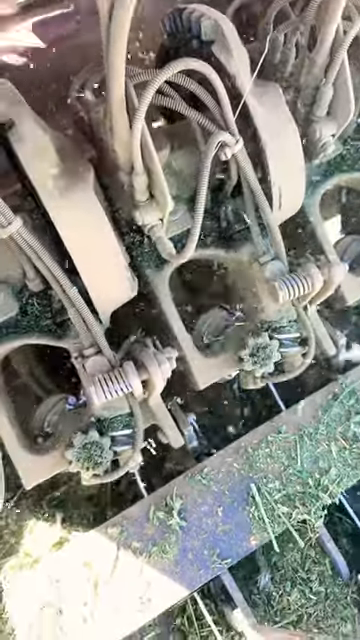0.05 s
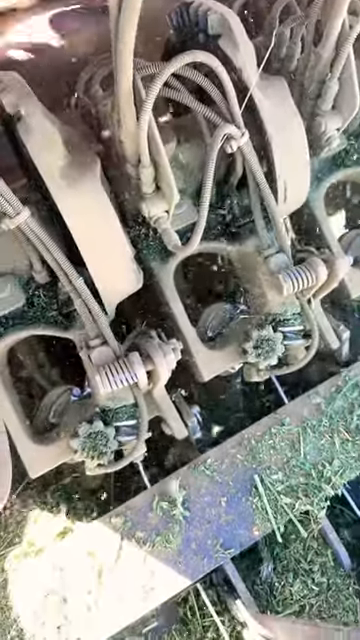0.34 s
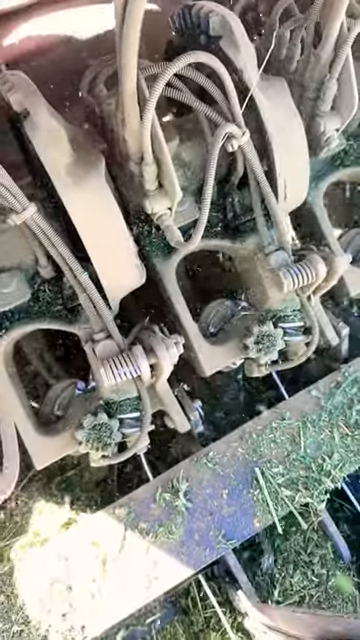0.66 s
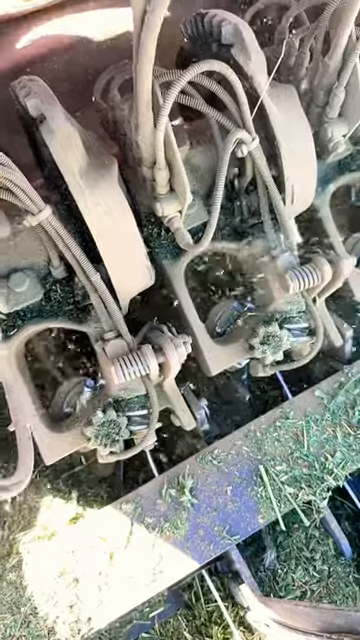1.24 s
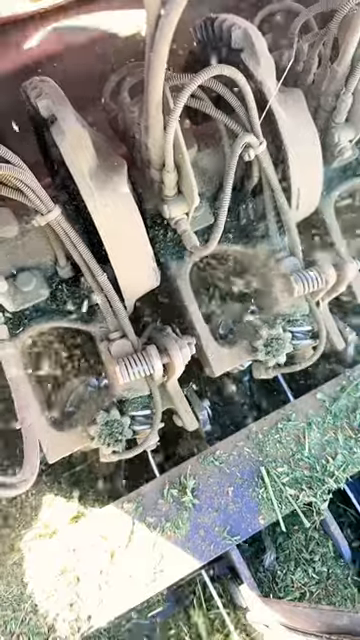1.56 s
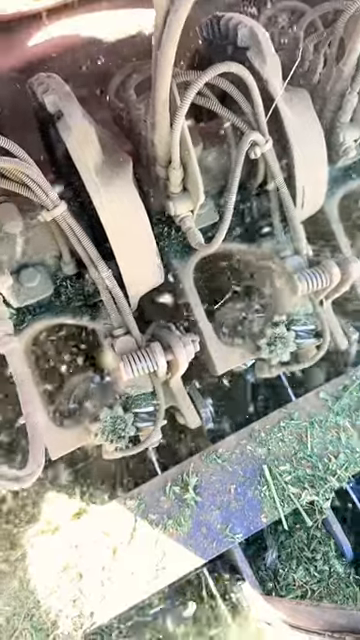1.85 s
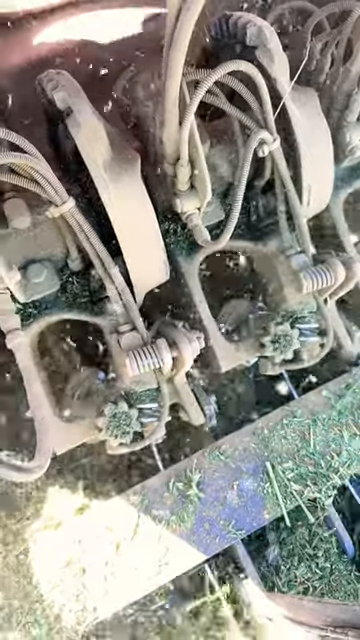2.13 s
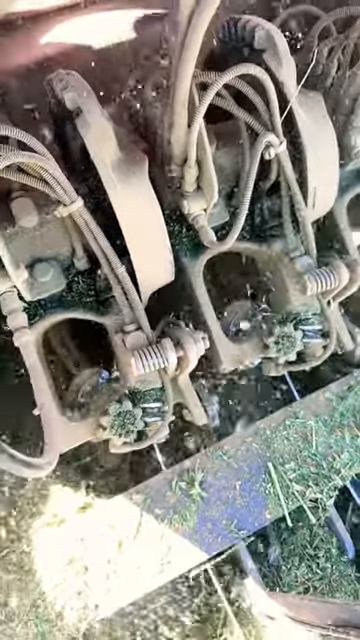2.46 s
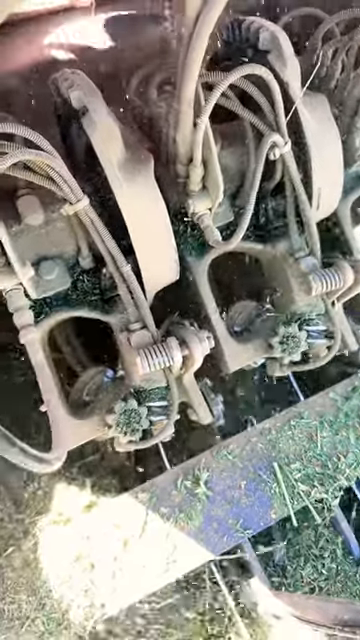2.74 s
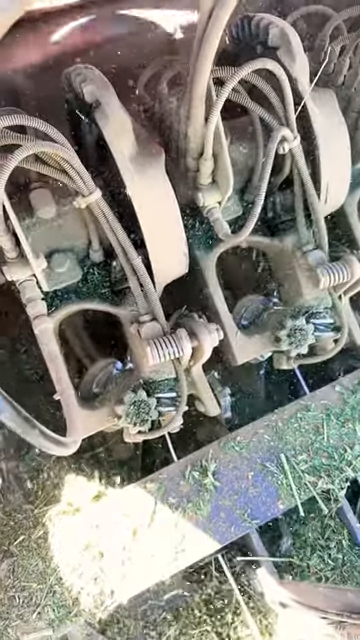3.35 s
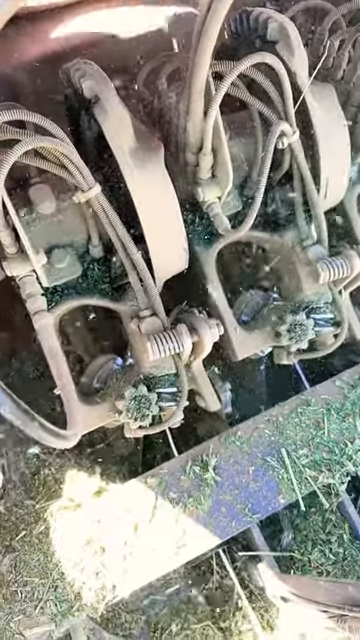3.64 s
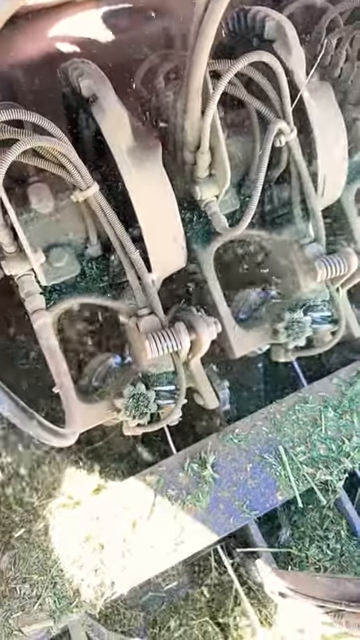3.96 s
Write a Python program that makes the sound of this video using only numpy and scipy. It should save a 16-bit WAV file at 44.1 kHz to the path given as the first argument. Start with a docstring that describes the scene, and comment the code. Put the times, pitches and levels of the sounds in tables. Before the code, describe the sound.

A hay baler drones in slow motion throughout, heard up close, with low sliding tones, wavering gear whines and a soft rush of hay. From about 1.2 to 2.3 seconds its knotter cycles in louder, drawn-out clacks. Two heavy blows ring the metal near 1.5 and 2.1 seconds, with thin steel squeaks around them. The drone and a quieter smeared rattle then carry on until 4 seconds.

```python
"""A heavy, wandering drone under a cloud of gliding partials: a hay baler at work, in slow motion.
The stereo microphone sits just above the knotters, its two ports hearing each tone at a different phase.
Tractor and baler drone, the running gear whines, and hay and chaff rush softly behind them.
The knotter cycles once, from about 1.2 to 2.3 s: each clack is drawn out into a swell,
two heavy blows ring the frame, and the steel parts sing on."""
import sys
import numpy as np
from scipy import signal
from scipy.fft import rfft, irfft
from scipy.io import wavfile

SR = 44100
rng = np.random.default_rng(int(sys.argv[2]) if len(sys.argv) > 2 else 0)


def to_wav(s):
    """Save 16-bit WAV."""
    ch = np.atleast_2d(s).T  # columns
    pcm = np.round(np.clip(ch, -1, 1) * 32767)  # PCM
    wavfile.write(sys.argv[1], SR, pcm.astype(np.int16))


N = 176400
STEP = 128  # samples between control points
T = np.arange(N // STEP + 2) * STEP / SR

# rush of hay and chaff, relative to the machine's level (frequency [Hz], level [dB])
CHAFF_SPECTRUM = [(25, -17), (60, -19), (150, -12), (300, -15), (800, -14), (2000, -11), (5000, -7),
                  (10500, -5), (11600, -12), (12300, -36), (13600, -26), (15000, 4.5), (15800, -3)]
# held tones of tractor and baler (middle [s], length [s], pitch [Hz], slide [Hz], relative level [dB])
DRONE_TONES = [(0.057, 0.081, 140.4, -41, -37), (0.068, 0.065, 71, 24, -31.5),
               (0.075, 0.13, 219.8, -3, -29), (0.076, 0.23, 615, -40, -38), (0.104, 0.15, 353, 25, -36.5),
               (0.255, 0.13, 284, -24, -35), (0.27, 0.31, 107, -3.5, -36),
               (0.343, 0.34, 177.2, -6.5, -37.5), (0.404, 0.18, 367.6, -10, -38.5),
               (0.475, 0.21, 69, 17, -40), (0.627, 0.13, 435.5, -0.5, -38), (0.748, 0.417, 107, -46.5, -36),
               (0.761, 0.19, 148.7, 63, -32.5), (0.96, 0.252, 242.6, -58.5, -38),
               (1.124, 0.46, 348, 5, -39.5), (1.152, 0.21, 117.6, -18.5, -37.5),
               (1.267, 0.45, 257.7, -30.5, -36.5), (1.4, 0.2, 344, 24, -34.5), (1.389, 0.31, 128, -70, -34),
               (1.451, 0.058, 133, 9.5, -21), (1.464, 0.42, 603.4, 3, -35), (1.47, 0.08, 677, 0.5, -30.5),
               (1.466, 0.3, 758, -40, -41), (1.491, 0.058, 190.6, -2, -21.5), (1.51, 0.11, 800, 2, -33.5),
               (1.53, 0.19, 404, 18.5, -33.5), (1.589, 0.47, 504, -60.5, -38.5),
               (1.611, 0.17, 271, 44.5, -28.5), (1.696, 0.28, 128, -10, -24.5),
               (1.714, 0.097, 236.7, 17, -36), (1.86, 0.12, 224.5, 19.5, -29.5),
               (1.96, 0.2, 510, -58.5, -35.5), (1.999, 0.22, 156, -47.5, -24.5),
               (2.01, 0.29, 582.5, -26, -35), (2.015, 0.19, 299, 31, -28.5), (2.042, 0.46, 787, 44, -39),
               (2.094, 0.103, 444, 43, -31), (2.098, 0.25, 236, 15, -32), (2.152, 0.15, 151, 3.5, -29.5),
               (2.184, 0.3, 699, -21.5, -36.5), (2.194, 0.23, 390, 3, -35.5), (2.352, 0.075, 135, 10, -35),
               (2.356, 0.17, 66.3, -24.5, -34), (2.371, 0.1, 238, -4.5, -34),
               (2.483, 0.19, 163.8, -47.5, -33.5), (2.571, 0.1, 649, 14, -31), (2.612, 0.23, 113, 35, -34),
               (2.62, 0.3, 590, -7.5, -35), (2.74, 0.27, 189.8, -45, -34), (2.77, 0.17, 834, -12, -34.5),
               (2.82, 0.21, 298.5, 43.5, -38), (3.007, 0.32, 359, -40.5, -38.5),
               (3.073, 0.31, 181, 5.5, -31.5), (3.218, 0.456, 106.9, 64.5, -37),
               (3.249, 0.28, 345.6, -30, -38.5), (3.328, 0.15, 112.6, -59.5, -34),
               (3.45, 0.38, 226, 12, -35), (3.556, 0.28, 347, 14, -39), (3.596, 0.3, 169.2, 1, -36),
               (3.867, 0.31, 113, -0.5, -38), (3.884, 0.26, 217.7, 42.5, -35.5),
               (3.913, 0.14, 348, -29.5, -36.5), (3.97, 0.23, 597, -60, -36)]
# whines of the running gear (pitch [Hz], level over the machine's [dB], wander scale [Hz])
GEAR_WHINES = [(70.3, -12, 19), (345, -6, 11), (468, -2.5, 17), (593, -5, 12.2), (701, -2, 12),
               (842.7, 0.5, 11)]
# bands of the running din: mids, upper mids, treble (frequency [Hz])
DIN_BANDS = [860, 2170, 4750]
# din leading into the knotter's cycle (time [s], mids [dB], upper mids [dB], treble [dB])
DIN_LEAD_IN = [(0, -26, -35, -42.5), (.218, -31.5, -41.5, -48), (.34, -31, -40.5, -46),
               (.576, -32.5, -46, -48), (.72, -39, -47.5, -47.5), (.95, -36.5, -42, -45.5),
               (1.15, -33.5, -43.5, -47), (1.33, -32, -36.5, -40)]
# din after the cycle (time [s], mids [dB], upper mids [dB], treble [dB])
DIN_TAIL = [(2.43, -33, -40, -43.5), (2.53, -30, -35, -43.5), (2.7, -28.5, -34.5, -43.5),
            (2.86, -33.5, -41.5, -44), (3.02, -30.5, -41.5, -47), (3.24, -35, -48, -46.5),
            (3.33, -35.5, -42, -42), (3.48, -36, -45.5, -44), (3.62, -32, -42, -43.5),
            (3.73, -34, -44.5, -47.5), (4, -30.5, -38, -39.5)]
# share of one partial in the level of its din band (frequency [Hz], level [dB])
DIN_SPECTRUM = [(280, 4.5), (450, -3.5), (650, -2), (850, -8.5), (1100, -7), (1400, -10), (2000, -7.5),
                (3000, -7.5), (3800, -11), (4900, -18.5), (6500, -14), (8000, -15.5), (10000, -20.5),
                (11200, -15), (15500, -17.5)]
# bands of the knotter's clacks (frequency [Hz])
CLACK_BANDS = [800, 2200, 4500, 8000]
# clacks of the knotter (peak time [s], rise [s], fall [s], level in each of the four bands [dB])
KNOTTER_CLACKS = [(1.211, .039, 0.047, -40, -60, -49.5, -61), (1.455, 0.044, 0.051, -35, -35, -38.5, -50.5),
                  (1.58, 0.051, 0.055, -36.5, -41.5, -42, -50), (1.66, 0.024, 0.05, -32.5, -40, -45, -53.5),
                  (1.78, 0.038, 0.04, -37, -43, -44, -47), (1.95, 0.1, 0.061, -37, -44, -49.5, -57),
                  (2.075, 0.066, 0.05, -32, -37, -37, -41), (2.16, 0.033, 0.062, -34, -40.5, -38.5, -40.5),
                  (2.249, 0.029, 0.052, -36, -41, -41, -42.5)]
# colour shared by all clacks (frequency [Hz], level [dB])
CLACK_SPECTRUM = [(300, -2), (1100, 0.5), (1400, -2.5), (2000, 2), (3050, 2.5), (3500, -1), (4300, 1),
                  (4850, -6.5), (5600, 0), (7600, 2.5), (8700, 2), (9500, -2), (11200, -5), (15500, -11)]
# two heavy blows on the frame (peak time [s], rise [s], fall [s], level [dB])
FRAME_BLOWS = [(1.461, 0.046, 0.096, -38), (2.085, 0.048, 0.069, -31)]
# modes of the knotter's steel frame (pitch [Hz], level relative to the blow [dB])
STEEL_MODES = [(1150, 5.5), (1365, 1.5), (1540, -4.5), (1670, -6.5), (1922, -5), (2050, 0), (2210, -17),
               (2710, -24), (3040, -0.5)]
# ringing steel parts (peak time [s], rise [s], fall [s], pitch [Hz], relative level [dB], jitter [Hz])
STEEL_RINGS = [(.35, .05, .05, 1120, -35, 6), (1.56, .035, .05, 1980, -33, 8),
               (1.80, .04, .09, 6799, -37, 25), (1.79, .04, .06, 9819, -38, 20),
               (1.865, .025, .055, 13900, -37, 170), (1.86, .035, .09, 15570, -38, 150),
               (2.07, .04, .06, 6525, -35, 14), (1.63, .08, .08, 2490, -39, 6),
               (2.14, .05, .04, 4530, -34, 30), (2.22, .11, .055, 5233, -34, 20),
               (2.23, .05, .04, 5755, -32, 35), (2.23, .05, .04, 4160, -36, 20),
               (2.21, .09, .04, 7601, -34, 10), (2.2, .08, .045, 7784, -34, 12),
               (2.17, .08, .05, 8037, -35, 12), (2.09, .04, .04, 5250, -35, 20),
               (3.9, .1, .14, 3045, -45, 45)]
# lead of the left microphone port over the right, before the bass taper (frequency [Hz], phase [rad])
MIC_PHASE = [(300, 0.065), (600, 0.53), (1000, 0.49), (1900, 0.36), (2750, 1.09), (3600, 5.3), (4300, 7.1),
             (5200, 4.8), (7000, 7.56), (8300, 4.54), (9500, 5.37), (11200, 3.41), (15500, 2.2)]
# random scatter of that lead (frequency [Hz], phase [rad])
MIC_SCATTER = [(300, 0.1), (600, 0.56), (1700, 0.071), (2500, 1), (4000, 1), (7000, 0.85), (12000, 0.087)]

FLICKER_PER_S, SPACING_HZ = 8.37, 116  # pace of level flicker; gap between the clatter's partials
TONE_WANDER_HZ, TONE_FLUTTER_DB = 5.18, 2.5  # unsteadiness of drone and frame


def amp(db):
    """Decibels to gain."""
    return 10 ** (np.asarray(db) / 20)


def read(points, hz):
    """Reads (Hz, value) points on a log-frequency axis."""
    f, value = np.transpose(points)
    return np.interp(np.log(hz + 1), np.log(f + 1), value)


def drift(per_s):
    """Smooth random motion of unit size."""
    size = 4096
    f = np.fft.rfftfreq(size, STEP / SR)
    x = irfft(rfft(rng.standard_normal(size)) * np.exp(-.5 * (f / per_s) ** 2))
    return (x / x.std())[:len(T)]


def glide():
    """A slow pitch glide with sudden slips and a quicker warble on it."""
    slow = drift(per_s=1.7)
    slips = .55 * np.tanh(4 * drift(per_s=3.4))
    warble = .35 * drift(per_s=6)
    return slow + slips + warble


def swell(at, rise, fall, fall_shape=2.6):
    """A blow drawn out in time: a rounded rise and fall."""
    width = np.where(T < at, rise, fall)
    shape = np.where(T < at, 2.6, fall_shape)
    return np.exp(-.5 * (abs(T - at) / width) ** shape)


def smooth_up(curve):
    """Joins control points by straight lines at the sample rate."""
    return np.interp(np.arange(N) / SR, T, curve)


def port_lead(hz, chance):
    """Half the phase by which the left port leads the right; deep bass reaches both alike."""
    alike_hz = 258
    phase = read(MIC_PHASE, hz) + read(MIC_SCATTER, hz) * chance
    return phase / (1 + (alike_hz / (hz + 1)) ** 2) / 2


def partial(hz, gain):
    """One gliding tone as it reaches the two microphone ports."""
    angle = 2 * np.pi * (np.cumsum(smooth_up(hz)) / SR + rng.random())
    lead = smooth_up(port_lead(hz.mean(), drift(FLICKER_PER_S)))
    return smooth_up(np.sqrt(2) * gain) * np.array([np.sin(angle + lead), np.sin(angle - lead)])


def machine_level(hz):
    """Gain over time at each pitch: the running din and the knotter's clacks add in power."""
    times, *bands = np.transpose(list(DIN_LEAD_IN) + list(DIN_TAIL))
    shares = np.array([read(list(zip(DIN_BANDS, one)), hz) for one in np.eye(len(bands))])
    band_db = np.array([np.interp(T, times, band) for band in bands])
    din = amp(shares.T @ band_db + read(DIN_SPECTRUM, hz)[:, None])
    colours = np.array([amp(read(list(zip(CLACK_BANDS, dbs)), hz) + read(CLACK_SPECTRUM, hz))
                        for _, _, _, *dbs in KNOTTER_CLACKS])
    swells = np.array([swell(at, rise, fall) for at, rise, fall, *_ in KNOTTER_CLACKS])
    return np.sqrt(din ** 2 + colours.T ** 2 @ swells ** 2)


def hay_clumps(hz, top_hz=2000, width_hz=260, depth_db=3.5):
    """Level swings in dB as clumps of hay pass, independent from band to band."""
    centres = np.arange(0, top_hz, width_hz)
    shares = np.maximum(1 - abs(hz[:, None] - centres) / width_hz, 0)
    return depth_db * shares @ np.array([np.minimum(drift(FLICKER_PER_S), 2) for _ in centres])


def chaff_rush(crunch_db=10, crunch_top_hz=2000):
    """Soft noise of hay and chaff follows the machine's level; crushed hay crunches under the blows."""
    size = 1024
    hz = np.fft.rfftfreq(size, 1 / SR)
    bin_share = np.sqrt(2 * SR / size / SPACING_HZ)
    gain = machine_level(hz) * amp(read(CHAFF_SPECTRUM, hz))[:, None] * bin_share
    blows = sum(swell(at, rise, fall) for at, rise, fall, _ in FRAME_BLOWS)
    crunch = crunch_db * blows / (1 + (hz[:, None] / crunch_top_hz) ** 2)
    gain = gain * amp(hay_clumps(hz) + crunch)
    real, imag, chance = rng.standard_normal((3, len(T), len(hz))).transpose(0, 2, 1)
    noise = gain * (real + 1j * imag)
    turn = np.exp(1j * port_lead(hz[:, None], chance))
    ports = np.array([noise * turn, noise / turn])
    return signal.istft(ports, nperseg=size, noverlap=size - STEP)[1][:, :N]


def held_tones():
    """Pitch, envelope and level of each drone tone: it swells, slides while it holds, and fades."""
    for at, length, hz, slide, db in DRONE_TONES:
        progress = 2 * (T - at) / length
        pitch = hz + slide / 2 * np.sin(np.clip(progress, -1, 1) * np.pi / 2)
        hold = np.exp(-.5 * abs(progress) ** 8.6)
        yield pitch, hold, db


def drone(boost_db=3.5, waver_per_s=7):
    """Heavy tones of tractor and baler hand over to one another."""
    out = 0
    for hz, hold, db in held_tones():
        pitch = hz + TONE_WANDER_HZ * drift(waver_per_s)
        flutter = TONE_FLUTTER_DB * drift(waver_per_s)
        out += partial(pitch, hold * amp(db + boost_db + flutter))
    return out


def give_way(pitch, crowding_hz=75):
    """Gain of a whine, which fades while a drone tone sounds close to its pitch."""
    dips = [1 - hold * np.exp(-((pitch - hz) / crowding_hz) ** 4) for hz, hold, _ in held_tones()]
    return np.prod(dips, axis=0)


def gear_whines(flicker_db=3):
    """The running gear holds a few wavering pitches between the heavy tones."""
    gains = machine_level(np.transpose(GEAR_WHINES)[0])
    out = 0
    for (hz, db, wander), gain in zip(GEAR_WHINES, gains):
        pitch = hz + wander * glide()
        flicker = flicker_db * drift(FLICKER_PER_S)
        out += partial(pitch, gain * give_way(pitch) * amp(db + flicker))
    return out


def clatter(low_hz=965, high_hz=11300, glide_hz=18, trim_db=-2.5, flicker_db=3.5):
    """Drawn-out rattle: a cloud of close, flickering partials that swells with each clack."""
    alike = .4  # correlation between the glides of neighbours
    pitches = np.arange(low_hz, high_hz, SPACING_HZ)
    out, bend = 0, glide()
    for hz, gain in zip(pitches, machine_level(pitches)):
        bend = alike * bend + np.sqrt(1 - alike ** 2) * glide()
        flicker = flicker_db * np.minimum(drift(FLICKER_PER_S), 2)
        out += partial(hz + glide_hz * bend, gain * amp(trim_db + flicker))
    return out


def frame_clanks():
    """Each heavy blow sets the modes of the steel frame ringing."""
    out = 0
    for at, rise, fall, db in FRAME_BLOWS:
        for hz, mode_db in STEEL_MODES:
            pitch = hz + TONE_WANDER_HZ * glide()
            flutter = TONE_FLUTTER_DB * drift(FLICKER_PER_S)
            out += partial(pitch, swell(at, rise, fall) * amp(db + mode_db + flutter))
    return out


def knotter_rings(boost_db=2.5, flutter_db=2, flutter_per_s=45):
    """Just below the microphone, the knotter's steel parts squeak and sing as they are struck."""
    out = 0
    for at, rise, fall, hz, db, jitter in STEEL_RINGS:
        pitch = hz + jitter * drift(flutter_per_s)
        flutter = flutter_db * drift(flutter_per_s)
        out += partial(pitch, swell(at, rise, fall, fall_shape=1.7) * amp(db + boost_db + flutter))
    return out


def scene():
    """Chaff, running machine and the knotter's cycle, heard from just above the knotters."""
    return chaff_rush() + drone() + gear_whines() + clatter() + frame_clanks() + knotter_rings()


def record(dry):
    """The recorder's band limit cuts the highest treble."""
    edge_hz = 15900
    lowpass = signal.firwin(511, edge_hz, window=("kaiser", 9), fs=SR)
    return signal.oaconvolve(dry, lowpass[None], "same")


dry = scene()
out = record(dry)
to_wav(out)
```